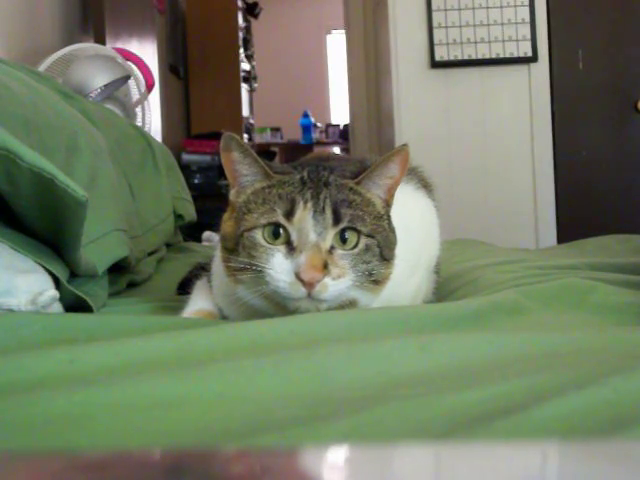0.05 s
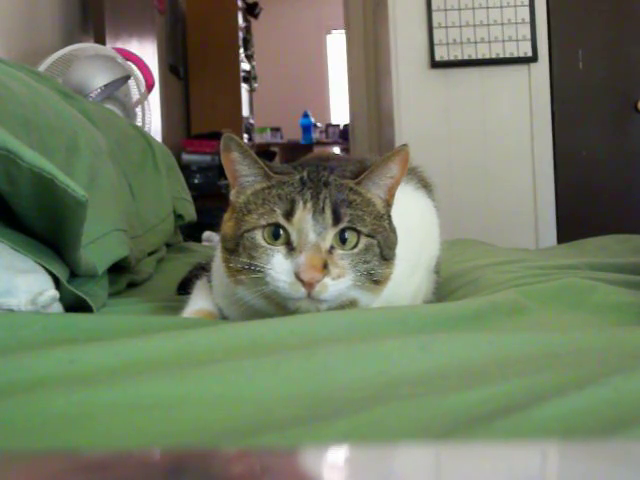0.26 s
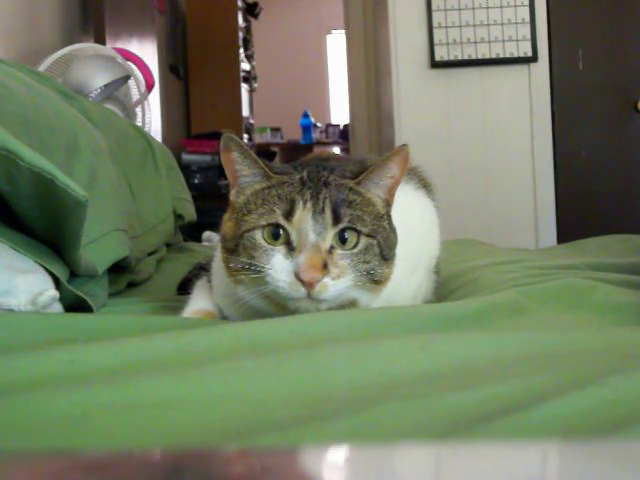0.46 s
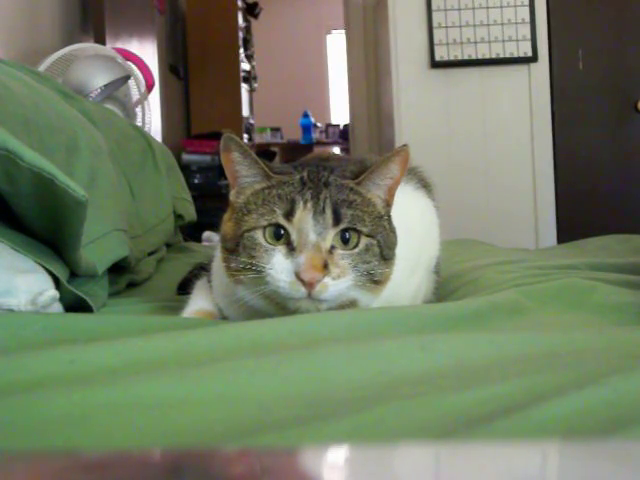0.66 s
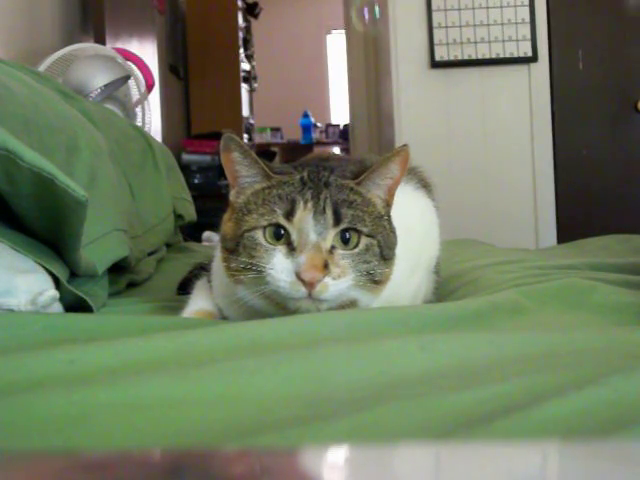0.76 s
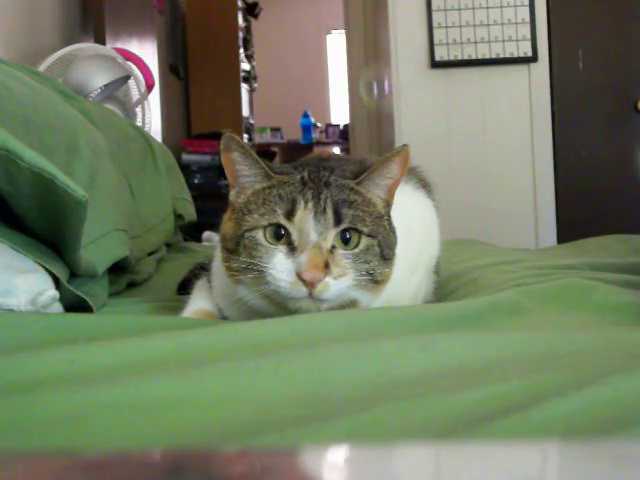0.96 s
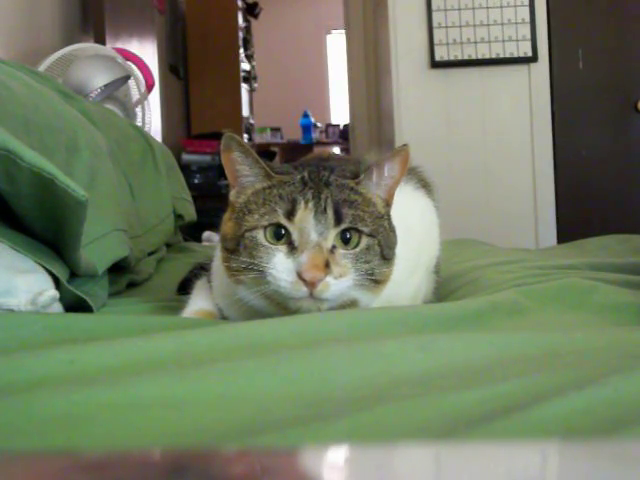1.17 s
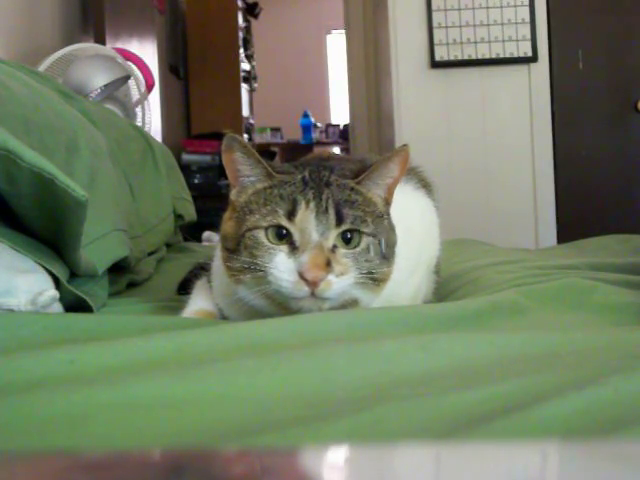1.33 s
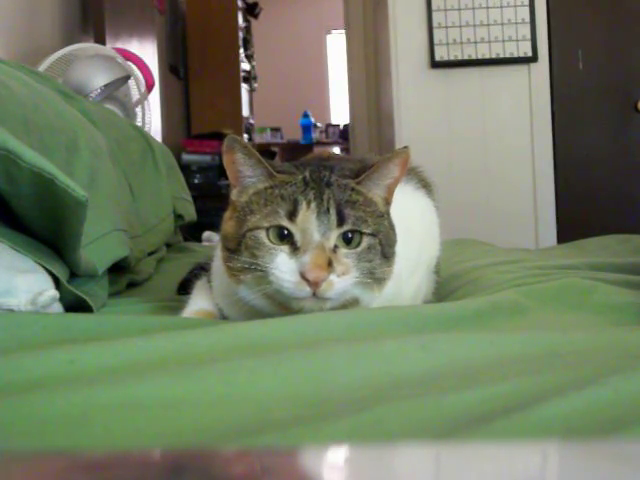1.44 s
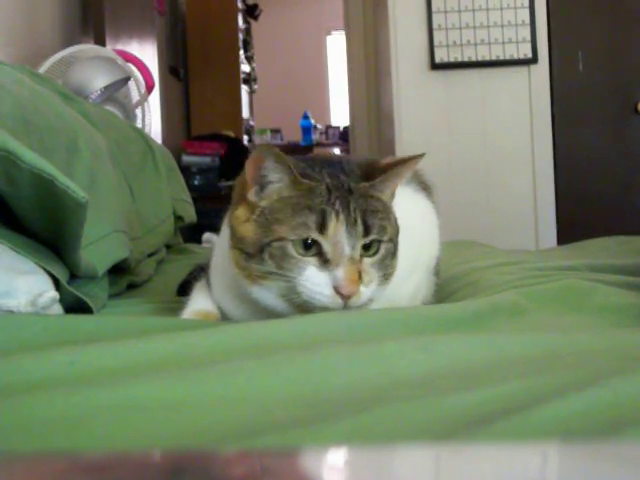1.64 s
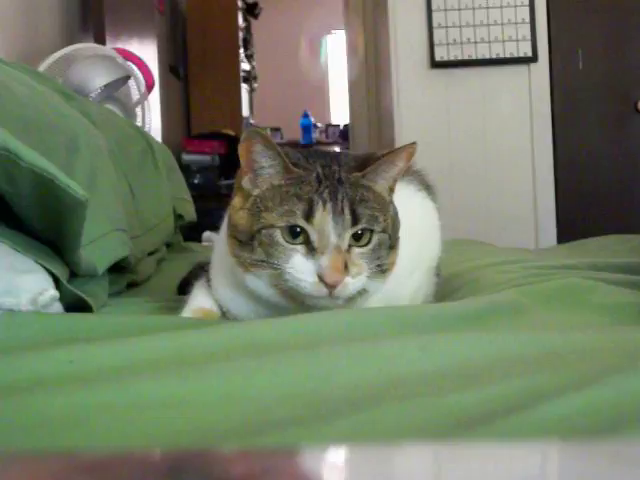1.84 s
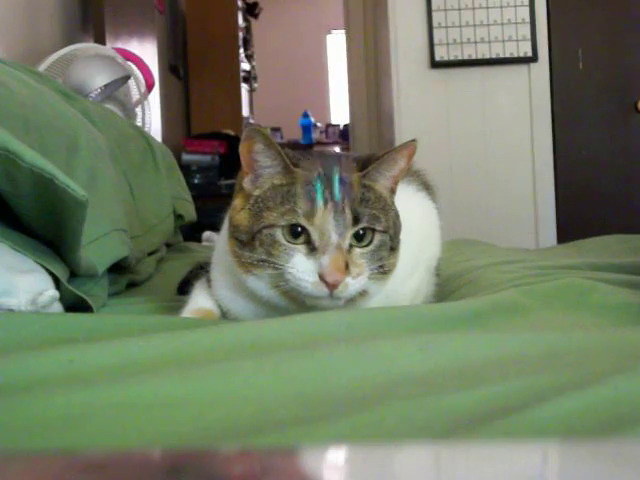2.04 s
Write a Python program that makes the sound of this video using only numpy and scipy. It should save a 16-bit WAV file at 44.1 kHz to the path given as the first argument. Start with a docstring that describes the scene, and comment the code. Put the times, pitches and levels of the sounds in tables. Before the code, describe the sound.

A few tiny bubble pops and dull ticks in a quiet, humming bedroom.

```python
"""Soap bubbles bursting in a quiet bedroom

Three bubbles burst close by: each torn film gives a falling chirp and a tiny push of air.
Three duller ticks sound between and after them, and the walls answer faintly.
Behind lie a low drone like a distant engine, mains hum, and room hiss with a faint high whine."""
import sys
import numpy as np
from scipy import signal
from scipy.fft import rfft, irfft, next_fast_len
from scipy.io import wavfile
from scipy.ndimage import uniform_filter1d, map_coordinates

SR = 44100
rng = np.random.default_rng(int(sys.argv[2]) if len(sys.argv) > 2 else 0)


def store_wav(level_fs):
    """Save 16-bit WAV to argv[1]."""
    pcm = np.round(np.clip(np.atleast_2d(level_fs), -1, 1) * 32767)
    wavfile.write(sys.argv[1], SR, pcm.T.astype(np.int16))


N = 92610  # 2.1 seconds
TIME = np.arange(N) / SR
MS = .001  # one millisecond, in seconds


def gain(db):
    """Turn decibels into a number to multiply by."""
    return 10 ** (np.asarray(db) / 20)


def value_at(points, hz):
    """Read between (frequency, value) points, spacing them by octaves."""
    freqs, values = np.transpose(points)
    return np.interp(np.log(hz + 1), np.log(freqs + 1), values)


def curves(rows):
    """Join timed rows with straight lines: one curve for each column after the time."""
    times, *columns = np.transpose(rows)
    return [np.interp(TIME, times, column) for column in columns]


def normalise(x):
    """Scale to an average strength (rms) of 1."""
    return x / np.sqrt(np.mean(x ** 2) + 1e-20)


def wobble(rate):
    """A smooth curve through `rate` random values a second."""
    return map_coordinates(rng.standard_normal(int(N * rate / SR) + 4), [TIME * rate])


def tone(hz):
    """A pure tone of strength 1 that follows a pitch curve."""
    return np.sqrt(2) * np.sin(2 * np.pi * (np.cumsum(hz) / SR + rng.random()))


def blip(at, hz, half_ms):
    """A tiny wave around the time `at`, dipping first."""
    since = TIME - at
    return np.exp(-(since / MS / half_ms) ** 2) * np.sin(2 * np.pi * hz * since)


def filtered(x, response):
    """Multiply each frequency f in x by response(f)."""
    size = next_fast_len(N + SR // 2)
    return irfft(rfft(x, size) * response(np.fft.rfftfreq(size, 1 / SR)), size)[:N]


def resonate(x, bands):
    """Boost or cut bands of frequencies; a boosted band rings briefly."""
    def bell(f, hz, width_hz, db):
        detune, damping = hz * hz - f * f, 1j * f * width_hz
        return (detune + damping * gain(db / 2)) / (detune + damping / gain(db / 2))
    return filtered(x, lambda f: np.prod([bell(f, *band) for band in bands], axis=0))


# the shape of the hiss, strongest in the bass (frequency [Hz], relative level [dB])
HISS_SHAPE = [(20, -73.5), (45, -79), (90, -77), (170, -82), (330, -84), (480, -89), (800, -87.5),
              (1400, -94.5), (3000, -99.4), (4600, -101), (5600, -109.5), (6200, -118), (6750, -125),
              (7150, -130)]

def hiss(level_db=-52.5, patchy_db=1.28):
    """Soft room noise, with small patches of it a little louder or quieter."""
    spectrum = signal.stft(rng.standard_normal(N), nperseg=512)[2]
    patches = uniform_filter1d(rng.standard_normal(spectrum.shape), size=5, axis=0)  # blur over pitch
    patches = uniform_filter1d(patches, size=12, axis=1)  # and over time
    noise = signal.istft(spectrum * gain(patchy_db * normalise(patches)), nperseg=512)[1][:N]
    shaped = filtered(noise, lambda f: gain(value_at(HISS_SHAPE, f)))
    return gain(level_db) * normalise(shaped)


# one low hum and two thin whines (pitch [Hz], level [dB])
ELECTRIC_TONES = [(59.5, -56), (5342, -80.5), (5680, -85)]

def hum_and_whine(drift=0.0012):
    """Mains power hums and electronics whine, barely wavering in pitch."""
    return sum(gain(db) * tone(hz * (1 + drift * wobble(49))) for hz, db in ELECTRIC_TONES)


# the motor's main tone and a higher one (time [s], pitch [Hz], level [dB])
MOTOR_MAIN = [(0, 113.2, -81.5), (0.101, 115.2, -59.5), (.25, 113.6, -50.5), (0.552, 115.2, -42.5),
              (.8, 117.6, -43.5), (1.102, 115.7, -45.5), (1.398, 117.9, -49), (1.852, 117.8, -49),
              (2.1, 119.3, -63)]
MOTOR_HIGH = [(0, 299, -67), (.6, 298, -67.5), (.92, 300, -59), (1.2, 301, -60.5), (1.4, 296, -66.5),
              (1.6, 299, -60.5), (1.8, 305, -56), (1.98, 304, -56.5), (2.1, 302, -59)]
# its weaker tones, before swell and waver (average pitch [Hz], start level [dB], end level [dB])
MOTOR_WEAK = [(74.2, -57.5, -54), (91.4, -65.5, -63), (138.3, -61.5, -76), (148.3, -61, -67),
              (191, -77, -65.5)]

def motor_drone(swell_share=0.15, waver_db=2, drift=0.0063):
    """A distant motor swells and slowly gains speed; weaker tones waver along with it."""
    main_hz, main_db = curves(MOTOR_MAIN)
    high_hz, high_db = curves(MOTOR_HIGH)
    sound = gain(main_db + 1.1 * wobble(10.44)) * tone(main_hz)
    sound += gain(high_db + 0.23 * wobble(20)) * tone(high_hz)
    swell_db = swell_share * (main_db - main_db.mean())
    for hz, start_db, end_db in MOTOR_WEAK:
        level_db = np.linspace(start_db, end_db, N) + swell_db + waver_db * wobble(6)
        pitch = hz * main_hz / main_hz.mean() * (1 + drift * wobble(8.4))
        sound += gain(level_db) * tone(pitch)
    return sound


# echoes from the nearest walls (delay [s], relative level [dB])
WALL_ECHOES = [(.0026, -28.5), (0.011, -35.5), (0.023, -32)]
# how long the room rings (frequency [Hz], time to fade by 60 dB [s])
ROOM_FADE = [(200, 0.32), (3000, 0.35), (7000, 0.99)]

def bedroom_echo(x, tail_db=-25.5):
    """Sound bounces off three near walls and blurs into a short fading tail."""
    hz, seconds, spectrum = signal.stft(rng.standard_normal(SR // 3), SR, nperseg=256)
    fade = gain(-60 * seconds / value_at(ROOM_FADE, hz)[:, None])
    tail = signal.istft(spectrum * fade, SR, nperseg=256)[1]
    tail /= np.linalg.norm(tail)
    walls = filtered(x, lambda f: sum(gain(db) * np.exp(-2j * np.pi * f * delay)
                                      for delay, db in WALL_ECHOES))
    return walls + gain(tail_db) * signal.fftconvolve(x, tail)[:N]


# the ticks before they ring (time [s], level [dB], pitch [Hz], half length [ms], first touch [dB])
DULL_TICKS = [(.2495, -24.5, 1880, 0.13, -51), (1.525, -40, 1245, 0.8, -38),
              (1.9398, -43, 1400, 0.68, -34.5)]
# the bands that shape each tick, one list per tick (frequency [Hz], width [Hz], boost or cut [dB])
TICK_BANDS = [
    [(2200, 700, -0.5)],
    [(1200, 130, 3.5), (2000, 310, 12), (2780, 310, 10)],
    [(3200, 700, 3)],
]

def dull_ticks(touch_lead_ms=0.97, echo_boost_db=7):
    """Soft contacts that ring briefly, each just after a finer first touch."""
    sound = np.zeros(N)
    for (at, db, hz, half_ms, touch_db), bands in zip(DULL_TICKS, TICK_BANDS):
        touch = gain(touch_db) * blip(at - touch_lead_ms * MS, hz=1640, half_ms=0.13)
        contact = gain(db) * blip(at, hz, half_ms)
        sound += resonate(touch + contact, bands)
    return sound + gain(echo_boost_db) * bedroom_echo(sound)


def tearing_film(at, hz, fall, half_ms, lowest_share=0.695, quiver_db=-4.5, quiver_ms=0.66):
    """A soap film tears unevenly with a falling chirp, then quivers to rest."""
    ms = (TIME - at) / MS
    pitch = hz * np.maximum(2 ** (-fall * np.clip(ms, -1, 10)), lowest_share)
    cycles = np.cumsum(pitch) / SR
    cycles -= np.interp(at, TIME, cycles)  # the wave crests at the moment of the burst
    tear = np.exp(-(ms / half_ms) ** 2)
    quiver = gain(quiver_db) * np.exp(-np.abs(ms) / quiver_ms) * (ms > 0)
    flutter = 1 + .12 * wobble(2400)
    return np.maximum(tear, quiver) * flutter * np.cos(2 * np.pi * cycles)


# one burst per row, with levels before the bands shape them (time [s], film level [dB],
# film pitch [Hz], pitch fall [octaves per ms], film half length [ms], split level [dB],
# crack level [dB], crack pitch [Hz], push level [dB], push pitch [Hz], air delay [ms], echo boost [dB])
BUBBLES = [(0.0742, -32, 3270, 0.73, 0.93, -34.5, -35.5, 2220, -54.5, 340, 0.47, 13.5),
           (0.69, -22, 4660, 0.48, 0.58, -34, -34, 990, -27.5, 482, -0.057, 0.5),
           (1.071, -9, 3340, 0.91, 0.36, -17.5, -23, 1124, -24, 260, 0.25, -6.5)]
# the bands that shape each pop, one list per bubble (frequency [Hz], width [Hz], boost or cut [dB])
BUBBLE_BANDS = [
    [(1700, 190, 8), (2400, 450, 2), (3210, 150, 8.5), (3970, 330, -3), (4700, 260, 2.5)],
    [(1100, 190, 9.5), (2350, 260, 6), (2990, 400, 10), (3820, 250, 1.5), (4360, 550, -7), (4910, 250, 1.5)],
    [(700, 160, 8), (1420, 660, 8), (1950, 110, -7), (2110, 230, 4), (2840, 560, 1.5), (3630, 470, 4.5),
     (3840, 380, -4.5), (4690, 410, 4.5), (4970, 230, -8), (5270, 270, 4.5)],
]
# the band of each pop that is boosted in its echo (frequency [Hz], width [Hz], boost [dB])
BUBBLE_ECHO_BANDS = [(5600, 580, 8), (4760, 900, 1), (3030, 390, 9.5)]

def bubble_pops(split_lead_ms=0.553, crack_half_cycles=0.23, push_half_cycles=0.46):
    """The film splits and tears; the freed air gives a crack and one low push."""
    sound = np.zeros(N)
    for bubble, bands, echo_band in zip(BUBBLES, BUBBLE_BANDS, BUBBLE_ECHO_BANDS):
        (at, film_db, film_hz, fall, half_ms, split_db,
         crack_db, crack_hz, push_db, push_hz, air_delay_ms, echo_db) = bubble
        split = gain(split_db) * blip(at - split_lead_ms * MS, hz=4590, half_ms=.21)
        film = gain(film_db) * tearing_film(at, film_hz, fall, half_ms)
        air_at = at + air_delay_ms * MS
        crack = gain(crack_db) * blip(air_at, crack_hz, crack_half_cycles / crack_hz / MS)
        push = gain(push_db) * blip(air_at, push_hz, push_half_cycles / push_hz / MS)
        pop = resonate(split + film + crack + push, bands)
        echo = bedroom_echo(resonate(pop, [echo_band]))
        sound += pop + gain(echo_db) * echo
    return sound


def scene():
    """Add all the sounds into one channel."""
    return (bubble_pops() + dull_ticks() + motor_drone() + hiss() + hum_and_whine())[None]


def record(dry):
    """The camera's microphone fades the treble steeply and keeps nothing above its top frequency."""
    top_hz, fade_width_hz = 7400, 1300
    def treble_cut(f):
        return np.sin(np.pi / 2 * np.clip((top_hz - f) / fade_width_hz, 0, 1)) ** 2
    return filtered(dry[0], treble_cut)[None]


dry = scene()
out = record(dry)
store_wav(out)
```